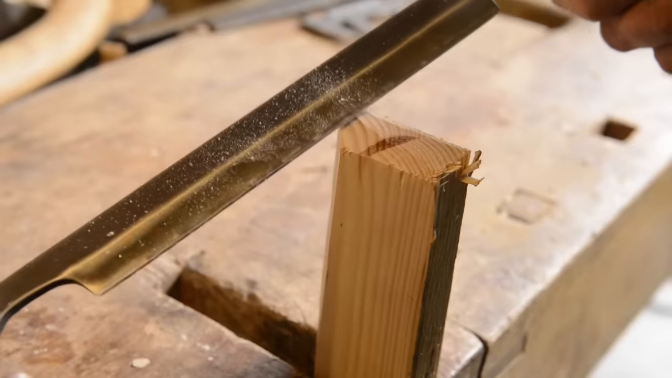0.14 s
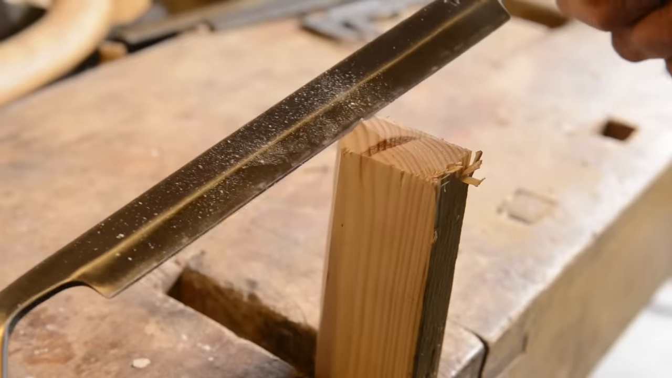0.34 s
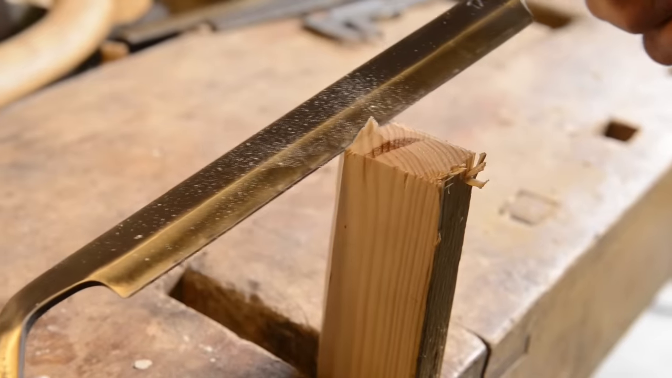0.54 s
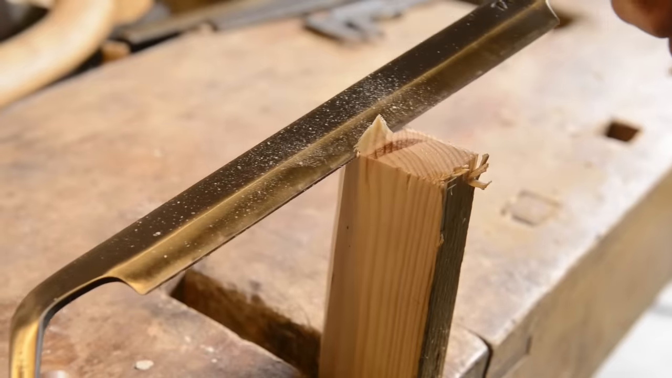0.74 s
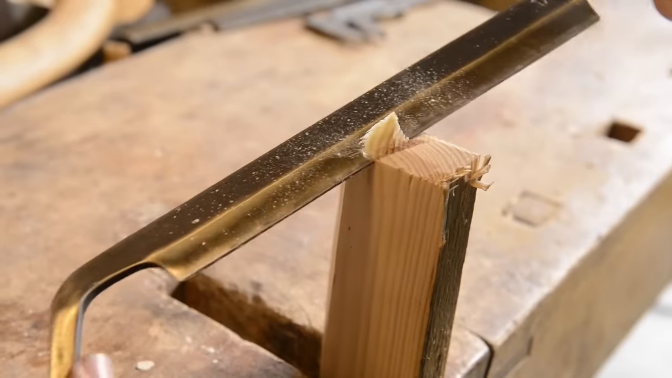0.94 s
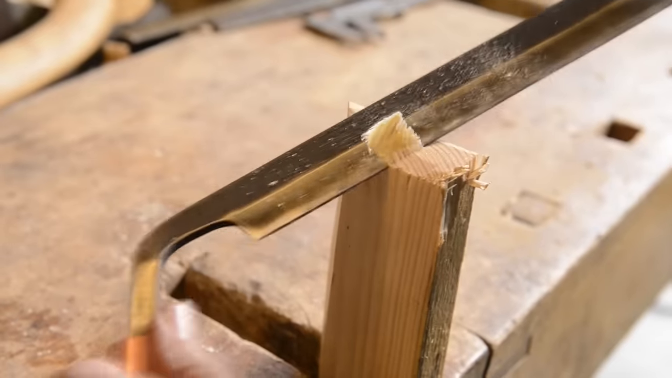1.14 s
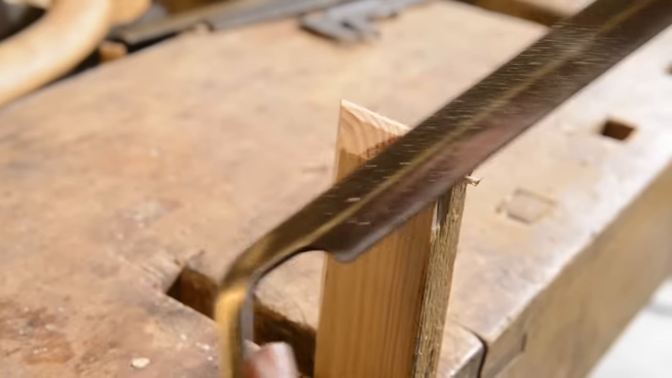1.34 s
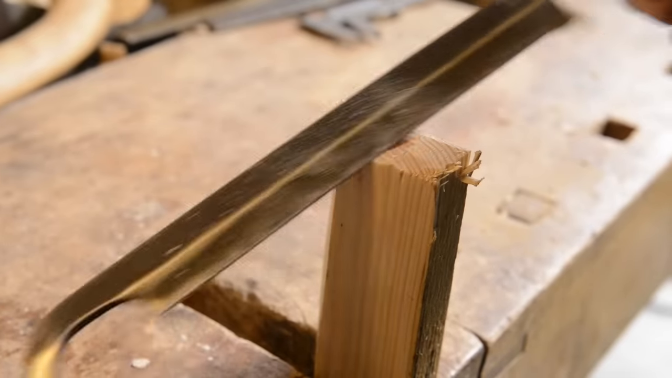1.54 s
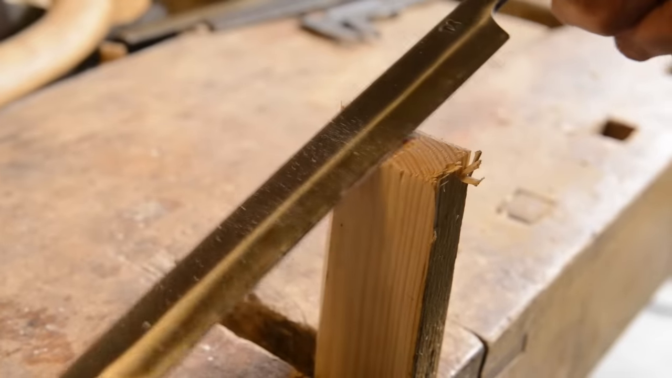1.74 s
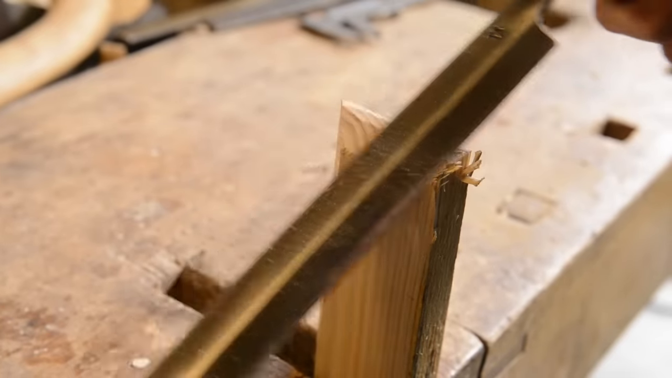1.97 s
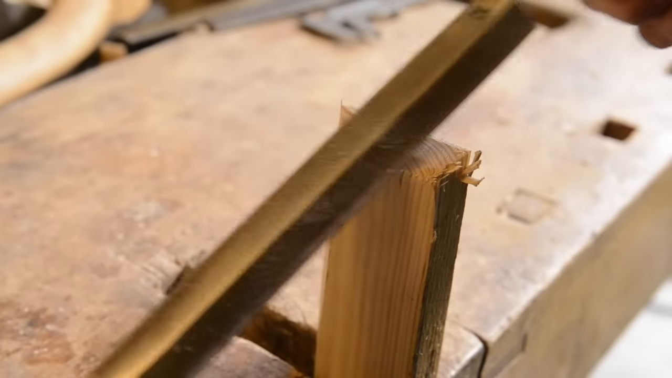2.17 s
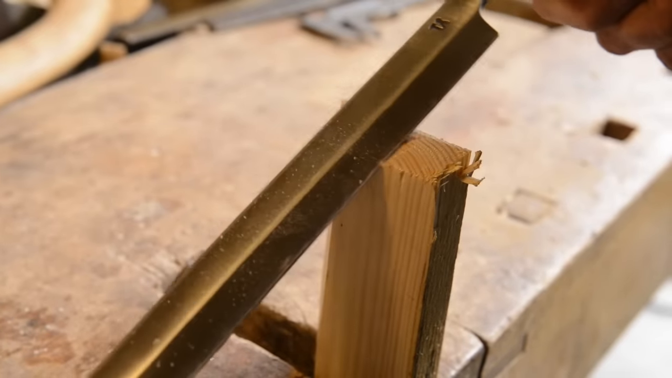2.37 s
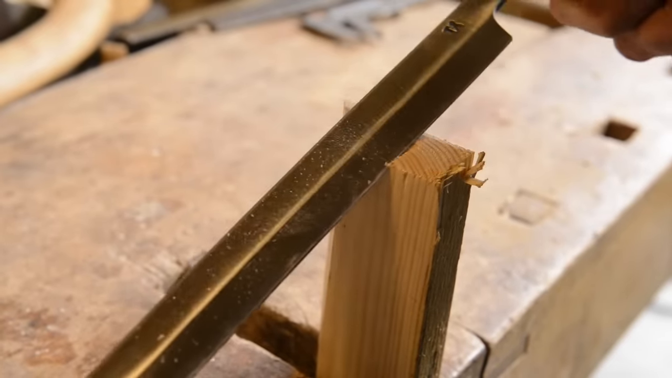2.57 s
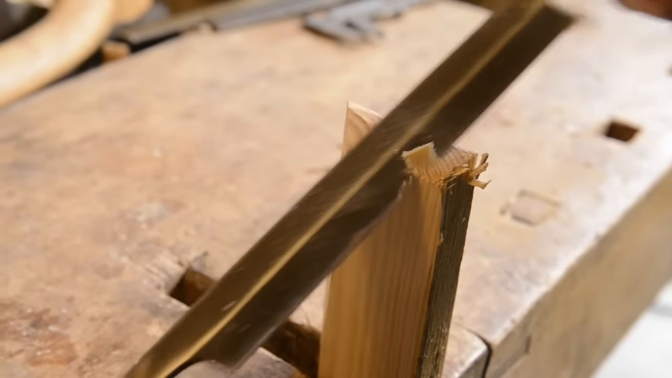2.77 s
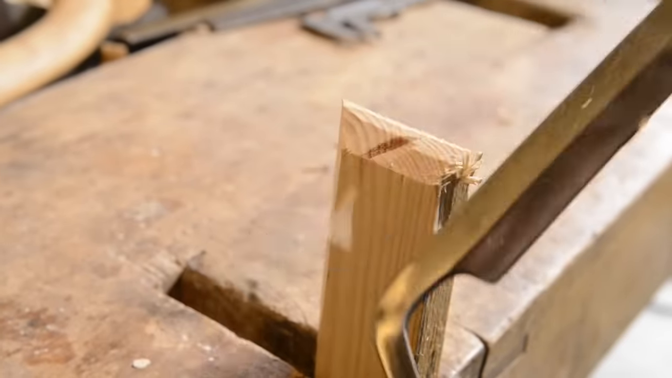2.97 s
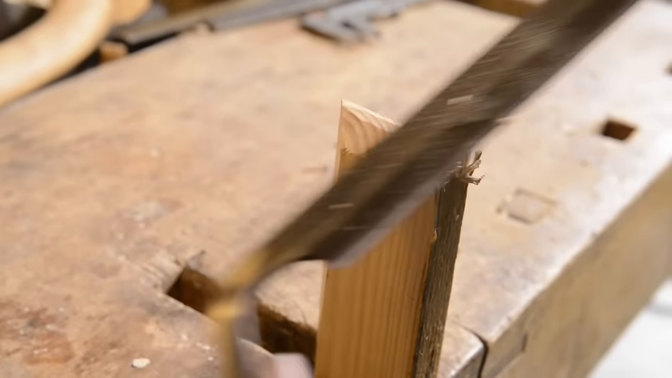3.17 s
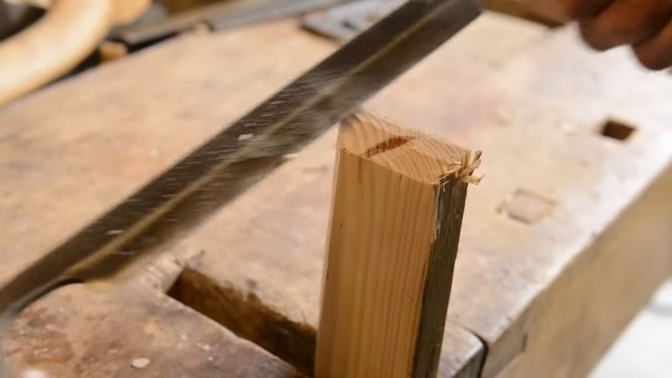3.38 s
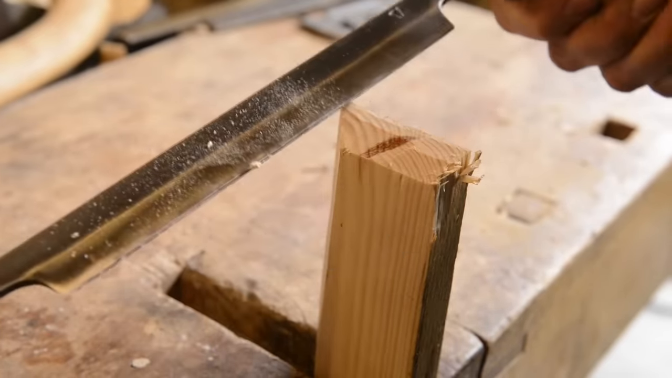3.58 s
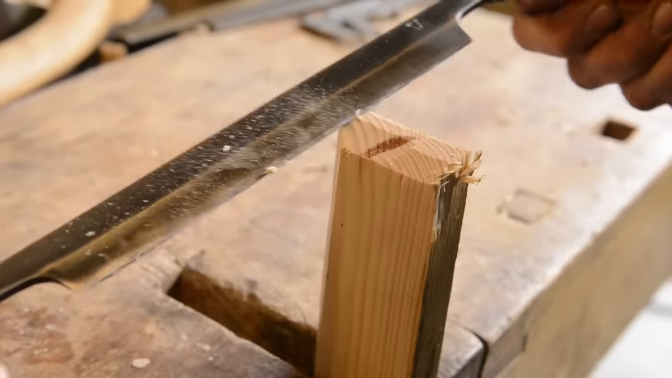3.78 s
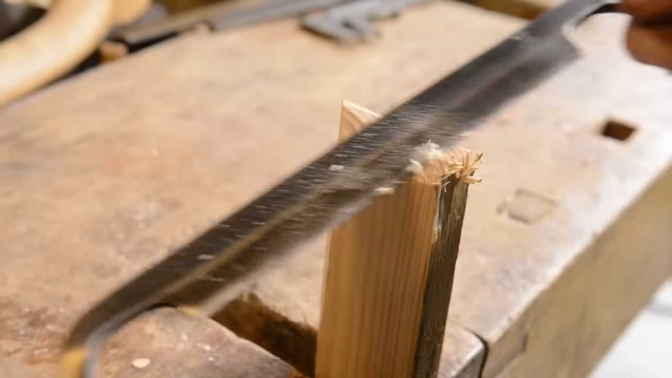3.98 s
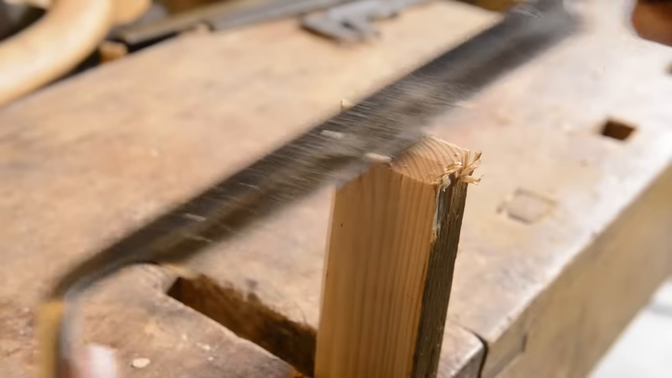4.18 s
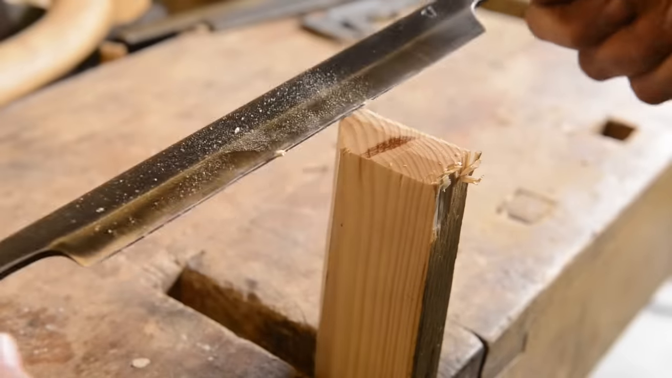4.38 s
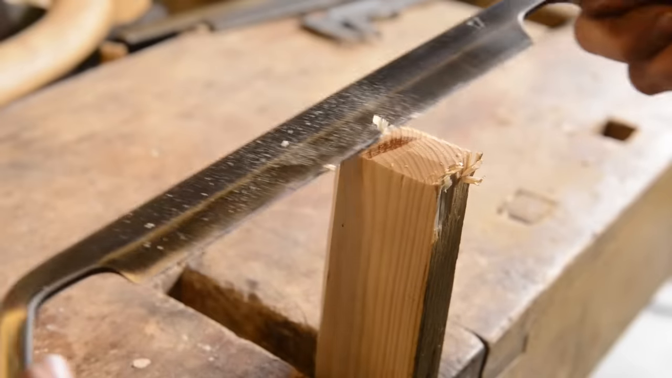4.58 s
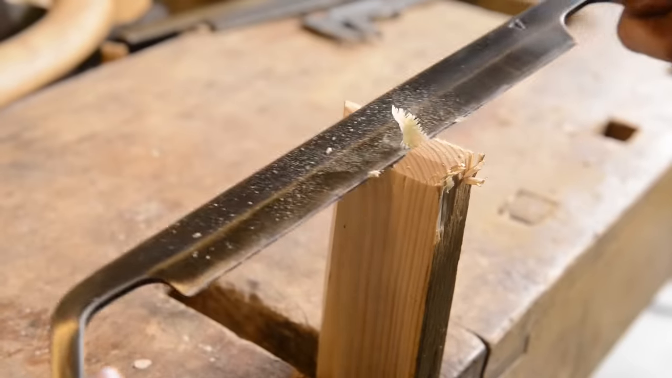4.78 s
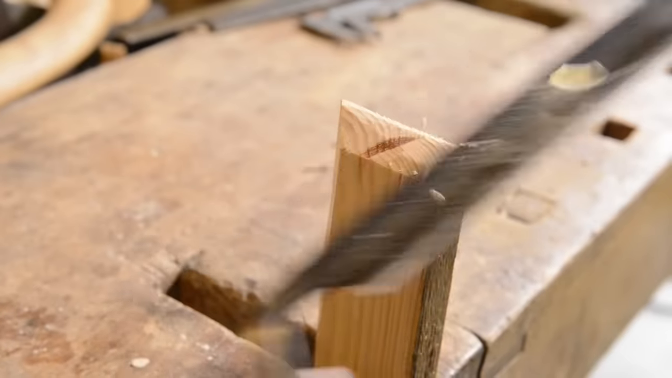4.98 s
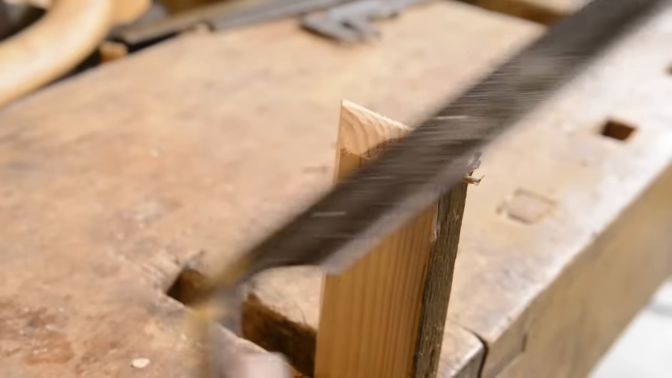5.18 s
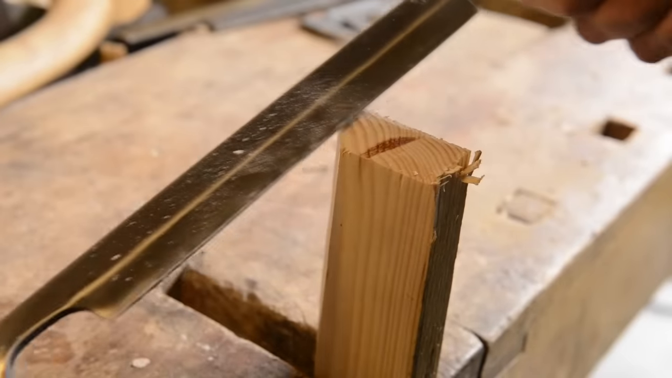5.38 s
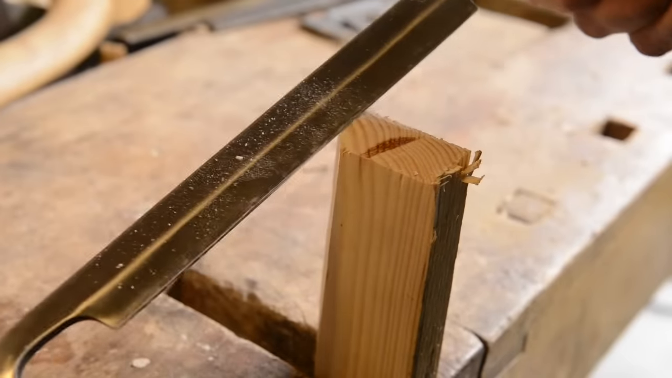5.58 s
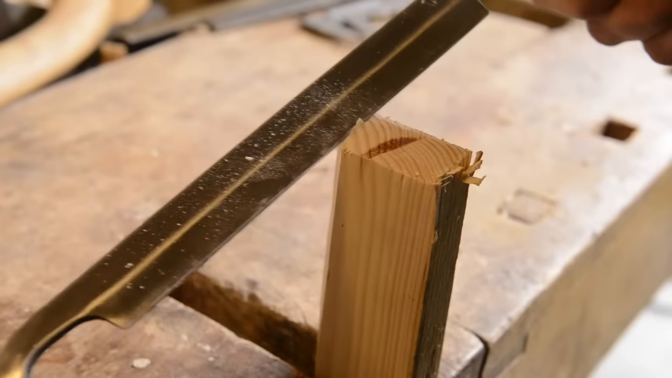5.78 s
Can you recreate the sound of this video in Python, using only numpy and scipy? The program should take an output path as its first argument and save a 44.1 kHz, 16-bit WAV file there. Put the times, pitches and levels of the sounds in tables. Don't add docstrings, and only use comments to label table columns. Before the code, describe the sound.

Close, detailed capture of a drawknife on a softwood stick at a workbench. A chip tick opens; scraping builds to a loud crack near 1.2 seconds. The blade resets with knocks, then a fierce tearing slice snaps free at 3 seconds. After a pause, two more slices follow, the second strongest, ending in falling chips and a light scuff. Small dry room response, with low outdoor hum behind.

```python
import sys
import numpy as np
from scipy import signal
from scipy.fft import rfft, irfft, next_fast_len
from scipy.io import wavfile

SR = 44100
rng = np.random.default_rng(int(sys.argv[2]) if len(sys.argv) > 2 else 0)


def how_loud(loudness_db):
    steps = np.asarray(loudness_db, float) / 20
    return 10 ** steps


def file_out(sig):
    cols = np.atleast_2d(sig).T
    lim = np.clip(cols, -1, 1)
    pcm = np.round(lim * 32767).astype(np.int16)
    wavfile.write(sys.argv[1], SR, pcm)


N = 256662

# (time [s], length [s], level [dB])
LEAF_GUSTS = [
    (2.097, 0.38, -58),
    (3.1, 0.57, -55),
    (4.148, 0.32, -60.5),
    (5.099, .5, -57.5),
]
# (time [s], length [s], start pitch [Hz], end pitch [Hz], level [dB])
BIRD_GLIDES = [
    (4.17, .085, 10000, 11020, -64.5),
    (4.25, 0.1, 10900, 10900, -67),
    (4.385, .04, 8600, 8000, -60),
]
# (frequency [Hz], density [dB per Hz])
HUM_SPECTRUM = [(13, -46), (22, -16), (53, -0.5), (87, -6.5), (118, 0.5), (194, -6.5), (241, -4.5),
                (262, -7), (651, -9.5), (931, -10), (1800, -15.5), (2070, -16.5), (3690, -25),
                (6950, -27.5), (15900, -36)]
# (time [s], peak level [dB], pitch [Hz])
HAND_BUMPS = [
    (0.015, -26, 338),
    (1.217, -6, 277),
    (1.23, -5, 240),
    (2.929, -4.5, 277),
    (3.068, -24.5, 440),
    (3.184, -24, 372),
    (3.302, -26.5, 409.4),
    (5.373, -28.5, 386),
]
# (time [s], peak level [dB], centre [Hz], tail t60 [s])
CHIP_TICKS = [
    (0.0338, -14.5, 8900, 0.11),
    (1.66, -30, 7300, 0.16),
    (3.104, -33, 4840, 0.043),
    (3.129, -18.5, 10900, 0.03),
    (3.2394, -42, 3120, 0.06),
    (5.038, -17, 3120, 0.075),
    (5.0736, -23, 9450, 0.06),
    (5.187, -28, 6740, 0.096),
]
# (time [s], crack [dB], ring pitch [Hz], ring level [dB], thud [dB])
BLADE_KNOCKS = [(0.2353, -49, 890, -53, -36.5), (0.9288, -9.5, 2530, -33, -38),
                (1.0315, -15, 2580, -26, -48), (1.0513, -11, 910, -13, -23.5),
                (1.2143, -4, 910, -16, -13.5), (1.465, -44, 910, -39, -49), (1.5138, -26.5, 1170, -35, -57),
                (1.5868, -27, 2700, -20, -28), (1.6258, -34, 1000, -33, -28), (1.8187, -20, 2680, -32, -45),
                (2.3506, -28.5, 1200, -26, -32.5), (2.6783, -13, 2860, -18, -38),
                (2.988, -5, 3040, -13.5, -42), (3.6747, -22.5, 1710, -16, -29),
                (4.4122, -43, 1550, -29, -34.5), (5.582, -52, 915, -47, -41)]
# (frequency [Hz], level [dB], t60 [s])
THUD_MODES = [(271, -32, 0.037), (453, 3.5, 0.05), (655, -8, 0.1), (758, -10, 0.24)]
BLOW_TIMES = [
    1.2508,
    1.6955,
]
BLOW_CRACKS = [
    -11,
    -37,
]
# (frequency [Hz], level [dB], t60 [s])
BREAK_FREE_MODES = [(247, -32.5, 0.2), (657, -29, 0.16), (750, -36, 0.17), (1110.5, -14.5, 0.092),
                    (1794, -21, 0.17), (2000, -31, 0.22), (2040, 5, 0.012), (2700, -14, 0.025)]
# (frequency [Hz], level [dB], t60 [s])
TOUCH_DOWN_MODES = [(427, -21, 0.19), (810, -27, 0.11), (990, -14.5, 0.2), (1252, -16, 0.051),
                    (1630, -15.5, 0.022), (2000, -13.5, 0.018), (2520, -16.5, 0.018), (3370, -19.5, 0.03)]
# (frequency [Hz], width [Hz], level [dB])
BENCH_MODES = [(144.6, 31.5, -2.5), (217, 25, 1), (310.3, 40, 0), (371.5, 33, 0.5), (404, 86, -5.5)]
# (frequency [Hz], width [Hz], level [dB])
STICK_MODES = [(593, 91, -4), (662, 100, 5), (724, 75, 5), (812, 16, 10), (855.5, 32, 7.5), (976, 33, -2),
               (955, 11.7, -11), (1200, 39, -7)]
# (frequency [Hz], width [Hz], level [dB])
BLADE_MODES = [(1540, 60, -8), (1700, 40, -4), (1860, 80, -8), (2010, 70, -5), (2270, 60, -5),
               (2395, 50, -5), (2510, 55, -2), (2720, 80, -3), (2885, 80, 3), (2945, 60, 1), (3100, 90, -5),
               (3280, 60, -3), (3520, 110, -6), (3750, 60, -7)]
# (frequency [Hz], width [Hz], level [dB])
SPINE_MODES = [(2930, 136, 5.3), (2295, 310, -5)]
# (frequency [Hz], level [dB])
EDGE_MODES = [(4580, -3.5), (5000, 6), (5480, 7.5), (5930, 6), (6250, 4.5), (6660, 5.5), (6910, 9),
              (7290, 12), (8350, 16), (8870, 8), (9730, 5), (10720, 5)]
# (frequency [Hz], density [dB per Hz])
FIBRE_SPECTRUM = [(2240, -22), (3800, -5.5), (4390, -5), (6060, -2.5), (7430, -3), (8030, -5), (10100, -9),
                  (14900, -20), (15900, -24)]
# (time [s], rise [s], fall [s], force [dB], fibre hiss over force [dB])
SLICES = [(0.342, 0.029, 0.45, -31.5, -3.5), (0.563, 0.053, 0.093, -26.5, -3.5),
          (0.66, 0.077, 0.15, -37, 0), (0.808, 0.047, 0.11, -29.5, 0.5), (0.909, 0.035, 0.079, -23, -5.5),
          (1.048, 0.0065, 0.057, -17, -9.5), (1.091, 0.051, 0.062, -19.5, -3),
          (1.798, 0.037, 0.11, -32.5, -8), (1.901, 0.1, 0.048, -26, -8), (2.401, 0.029, 0.038, -33, -11.5),
          (2.5, 0.041, 0.028, -38.5, -7), (2.593, 0.094, 0.27, -35, -0.5), (2.75, 0.051, 0.039, -12.5, -1),
          (2.8, 0.047, 0.089, -14, -1), (2.9, 0.014, 0.02, -11.5, -0.5), (2.964, 0.028, 0.037, -34, 3.5),
          (3.79, 0.055, 0.023, -31.5, 8), (3.814, 0.16, 0.15, -18.5, -7.5),
          (3.935, 0.12, 0.057, -21.5, -4.5), (4.48, 0.072, 0.14, -27.5, 2), (4.54, 0.075, 0.17, -21, -10),
          (4.687, 0.081, 0.11, -15, -7.5), (4.862, 0.085, 0.026, -23, 0), (4.92, 0.044, 0.069, -10.5, -5)]
# (time [s], rise [s],
# fall [s], force [dB], fibre hiss over force [dB])
FURTHER_PUSHES = [(0.236, 0.0051, 0.037, -39, -37), (1.022, 0.016, 0.04, -28, -1.5),
                  (1.204, 0.013, 0.052, -11.5, -21.5), (1.27, 0.012, 0.24, -29.5, -14),
                  (1.461, 0.013, 0.26, -36, -16), (1.58, 0.009, 0.088, -27, -21),
                  (1.665, 0.039, 0.093, -23, -16.5), (2.35, 0.0025, 0.035, -33, -19),
                  (3.0, 0.042, 0.15, -39.5, -8), (3.12, 0.048, 0.25, -43.5, -24),
                  (3.673, 0.013, 0.042, -33.5, -16), (3.708, 0.0084, 0.17, -39, -1.5),
                  (4.414, 0.0061, 0.034, -33.5, -36), (4.974, 0.015, 0.15, -24.5, -8),
                  (5.12, 0.12, 0.39, -44, -17), (5.582, 0.0073, 0.066, -41, -8),
                  (5.718, 0.038, 0.06, -32.5, -1)]
# (time [s], blade ring [dB], lean on the bench [dB], bending of the spine [dB])
GRIP = [(0.35, -2.5, -3.5, -3), (0.8, 3.5, -6, 0), (1.06, 0.8, 7, -2), (1.22, -0.5, 2, -9),
        (1.5, -6, 7.5, 0), (1.85, 2.8, -10.5, -4), (2.05, -4.5, 1.5, 4), (2.7, 6.5, -7, -5),
        (2.85, 1.5, 1, 4.5), (3.0, -4.5, 5.5, -7), (3.6, -6.5, -2.5, -3), (3.95, -4.5, -2, 3),
        (4.5, -6, -7.5, 3.5), (4.72, -0.5, -0.5, 3), (4.82, -2, -1, 6), (4.93, 3.5, -3, 6.5),
        (5.05, -6.5, 8.5, -1), (5.75, -4.5, 1, -4)]


def rms_one(x):
    return x / np.sqrt(np.mean(x ** 2) + 1e-20)


def at_hz(points, hz):
    points = np.array(points)
    return np.interp(np.log(hz), np.log(points[:, 0]), points[:, 1])


def drift(rate):
    r = np.exp(-40 * np.pi * rate / SR)
    slow = signal.lfilter([1], [1, -2 * r, r * r], rng.standard_normal(N // 20 + 4002))[4000:]
    return np.interp(np.arange(N) / 20, np.arange(len(slow)), rms_one(slow - slow.mean()))


def band(x, low_hz, high_hz):
    sos = signal.butter(2, [low_hz, min(high_hz, 0.45 * SR)], "band", fs=SR, output="sos")
    return signal.sosfilt(sos, x) * np.sqrt(SR / 2 / (high_hz - low_hz))


def ring(clicks, hz, t60):
    r = how_loud(-60 / (max(t60, 0.002) * SR))
    w = 2 * np.pi * hz / SR
    return signal.lfilter([0, np.sin(w)], [1, -2 * r * np.cos(w), r * r], clicks + 1e-18)


def noise_puff(t60):
    t = np.arange(int(0.3 * SR)) / SR
    return rng.standard_normal(len(t)) * how_loud(-60 * t / max(t60, 0.003))


def add(out, s, sound):
    at = int(s * SR)
    out[at:at + len(sound)] += sound[:N - at]


def coloured(white, spectrum, patchy_db):
    low, high = spectrum[0][0], spectrum[-1][0]
    edges = np.geomspace(low, high, int(3 * np.log2(high / low)) + 2)
    centres = np.sqrt(edges[1:] * edges[:-1])
    power = how_loud(2 * at_hz(spectrum, centres)) * np.diff(edges)
    out = 0
    for k, share in enumerate(np.sqrt(power / power.sum())):
        flicker = how_loud(patchy_db * drift(4.8))
        out = out + share * band(white[k % 2] * flicker, edges[k], edges[k + 1])
    return out


def resonant(drive, modes, tilt, widen, wander_db):
    out, power = 0, 0
    centre = np.sqrt(modes[0][0] * modes[-1][0])
    for k, (hz, width, level_db) in enumerate(modes):
        r = np.exp(-np.pi * width * widen / SR)
        gain = how_loud(level_db + tilt * np.log2(hz / centre) + wander_db * drift(4.76))
        numerator = np.array([1, 0, -1]) * (1 - r * r) / 2
        denominator = [1, -2 * r * np.cos(2 * np.pi * hz / SR), r * r]
        out = out + signal.lfilter(numerator, denominator, drive * gain * (-1) ** k)
        power += how_loud(2 * level_db) * np.pi * width * widen / SR
    return out / np.sqrt(power)


def outdoor_hum():
    return how_loud(-44.5) * coloured(rng.standard_normal((2, N)), HUM_SPECTRUM, patchy_db=2.0)


def breeze():
    swell = np.zeros(N)
    for s, length, db in LEAF_GUSTS:
        add(swell, s, how_loud(db) * np.hanning(int(length * SR)) ** 0.6)
    return swell * band(rng.standard_normal(N), 3500, 9000)


def bird():
    out = np.zeros(N)
    for s, length, from_hz, to_hz, db in BIRD_GLIDES:
        hz = np.linspace(from_hz, to_hz, int(length * SR))
        fade = np.hanning(len(hz)) ** 0.45
        add(out, s, how_loud(db) * fade * np.sin(2 * np.pi * np.cumsum(hz) / SR))
    return out


def workshop(x):
    t60_s, wall_cut_hz = 0.25, 4400
    size = next_fast_len(N + SR)
    bins = np.arange(size // 2 + 1)
    turn = np.exp(-2j * np.pi * bins / size)
    dull = np.exp(-2 * np.pi * wall_cut_hz / SR)
    wall = (1 - dull) / (1 - dull * turn)
    echo = 0
    for k, lag in enumerate((rng.uniform(0.009, 0.04, 10) * SR).astype(int)):
        loop = how_loud(-60 * lag / SR / t60_s) * wall * np.exp(-2j * np.pi * lag * bins / size)
        echo = echo + (-1) ** k * loop / (1 - loop)
    return irfft(rfft(x, size) * echo, size)[:N]


def bumps():
    out = np.zeros(N)
    push = np.pad(np.hanning(40) / 20, (0, 4000))
    for s, peak_db, hz in HAND_BUMPS:
        add(out, s, how_loud(peak_db) * ring(push, hz, 0.035))
    return out


def chips():
    out = np.zeros(N)
    for s, peak_db, hz, t60 in CHIP_TICKS:
        tick = band(noise_puff(0.003), hz * 0.94, hz * 0.99)
        fizz = band(noise_puff(t60), hz * 0.74, hz * 1.33)
        add(out, s, how_loud(peak_db - 9.0) * (tick + 0.49 * fizz))
    return out


def knocks():
    out = np.zeros(N)
    for s, crack_db, ring_hz, ring_db, thud_db in BLADE_KNOCKS:
        puff = noise_puff(0.031)
        strike = np.pad(np.hanning(9) / 4, (0, len(puff) - 9)) + 0.094 * puff
        add(out, s, how_loud(crack_db - 8) * band(puff, 1240, 7000))
        tone = 0.51 * ring(strike, ring_hz, 0.065) + ring(strike, ring_hz * 1.01, 0.017)
        add(out, s, how_loud(ring_db - 8.5) * tone)
        push = signal.lfilter([0.15], [1, -0.85], strike) * 2.67
        for hz, db, t60 in THUD_MODES:
            add(out, s, how_loud(thud_db + db - 6 + rng.normal(0, 4.0)) * ring(push, hz, t60))
    return out


def blows():
    out = np.zeros(N)
    for s, modes, crack_db in zip(BLOW_TIMES, (BREAK_FREE_MODES, TOUCH_DOWN_MODES), BLOW_CRACKS):
        puff = noise_puff(0.0059)
        strike = np.pad(np.hanning(7) / 3, (0, len(puff) - 7)) + 0.027 * noise_puff(0.023)
        add(out, s, how_loud(crack_db) * band(puff, 2000, 8900))
        for hz, db, t60 in modes:
            add(out, s, how_loud(db) * ring(strike, hz, t60))
    return out


def pushes(fall_power):
    t = np.arange(0, N, 32) / SR
    s, rise, fall, db, hiss_db = np.transpose(list(SLICES) + list(FURTHER_PUSHES))[:, :, None]
    rise, fall = np.maximum(rise, 0.002), np.maximum(fall, 0.002)
    swell = np.clip((t - s) / rise, 0, 1) ** 0.98
    ease = np.clip((s + rise + fall - t) / fall, 0, 1) ** fall_power

    def summed(level_db):
        power = ((swell * ease * how_loud(level_db)) ** 2).sum(axis=0)
        return np.interp(np.arange(N) / SR, t, np.sqrt(power))

    steel_db = db + 0.5 * np.maximum(hiss_db, -21)
    return summed(db), summed(steel_db), summed(db + hiss_db)


def tearing(per_s, size_db, clump_db):
    sizes = how_loud(size_db * np.minimum(rng.exponential(1, N), 5)) * rng.choice([-1, 1], N)
    snaps = rng.random(N) < per_s / SR
    return rms_one(sizes * snaps * how_loud(clump_db * drift(73)))


def edge_hiss(drive, width_hz, spread_db, count):
    size = next_fast_len(N + 4096)
    hz = np.maximum(np.arange(size // 2 + 1) * SR / size, 1)[::16]
    strong_hz, strong_db = np.transpose(EDGE_MODES)
    many_hz = np.linspace(4100, 15700, count) + rng.uniform(-95, 72, count)
    modes = np.concatenate([strong_hz, many_hz])
    levels = np.concatenate([strong_db + 0.91, np.zeros(count)])
    poles = 1 / (1 + 2j * (hz[:, None] - modes) / (width_hz * (modes / 6000) ** 0.55))
    spread = spread_db * rng.standard_normal((3, len(modes)))
    signs = rng.choice([-1, 1], (3, len(modes)))
    out = 0
    for shares in how_loud(levels + spread) * signs:
        response = poles @ shares * how_loud(at_hz(FIBRE_SPECTRUM, hz))
        response /= np.sqrt(np.mean(np.abs(response) ** 2) * 3)
        impulse = irfft(response)[:4096]
        out = out + signal.fftconvolve(drive * how_loud(3.0 * drift(5.2)), impulse)[:N]
    return out


def strokes():
    s, *columns = np.transpose(GRIP)
    ring_db, lean_db, spine_db = [np.interp(np.arange(N) / SR, s, column) for column in columns]
    wood = pushes(fall_power=1.3)[0]
    steel, hiss = pushes(fall_power=1.1)[1:]
    hiss = hiss * how_loud(-0.56)
    tilt = 1.15 + 4 * ring_db

    force = tearing(6000, size_db=3.5, clump_db=2.5)
    bench = force * wood * how_loud(-3 + lean_db / 2)
    stick = force * wood * how_loud(-lean_db / 2)
    blade_level = steel * how_loud(2.5 + ring_db)
    blade = force * blade_level

    out = resonant(bench, BENCH_MODES, 0, widen=0.98, wander_db=2.0)
    out += how_loud(-10.0) * band(bench, 189, 542)
    out += how_loud(-4.5) * resonant(stick, STICK_MODES, tilt, widen=0.98, wander_db=2.5)
    out += how_loud(-9.0) * band(stick, 386, 1180)
    out += how_loud(-5.0) * resonant(blade, BLADE_MODES, 0.67 * tilt, widen=1.45, wander_db=1.7)
    out += how_loud(-6) * band(band(blade, 1310, 3380), 1380, 3010) * 0.43
    out += how_loud(-7.5) * resonant(blade * how_loud(spine_db), SPINE_MODES, 0, widen=0.71, wander_db=2.3)
    out += how_loud(-21.5) * band(blade, 1100, 1950)

    splinters = tearing(600, size_db=2.4, clump_db=2.0)
    out += how_loud(-16) * band(splinters * blade_level, 1500, 7000)
    fine = np.array([tearing(14000, size_db=3.0, clump_db=-0.5), tearing(14000, size_db=2.5, clump_db=2.0)])
    out += how_loud(-3.5) * edge_hiss(fine[0] * hiss, width_hz=42, spread_db=2.0, count=56)
    return out + how_loud(-2.5) * coloured(fine * hiss, FIBRE_SPECTRUM, patchy_db=5.0)


def scene():
    work = strokes() + knocks() + blows() + chips() + bumps()
    no_bass = signal.butter(4, 123, "high", fs=SR, output="sos")
    work = signal.sosfilt(no_bass, work)
    return (work + how_loud(-14) * workshop(work) + outdoor_hum() + bird() + breeze())[None]


def roll_off(x):
    return signal.sosfilt(signal.butter(12, 16020, fs=SR, output="sos"), x)


def record(dry):
    mix = np.clip(dry, -1, 1)
    return roll_off(mix)


dry = scene()
out = record(dry)
file_out(out)
```